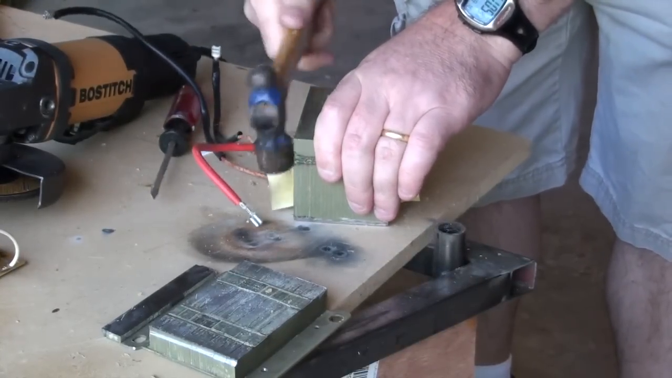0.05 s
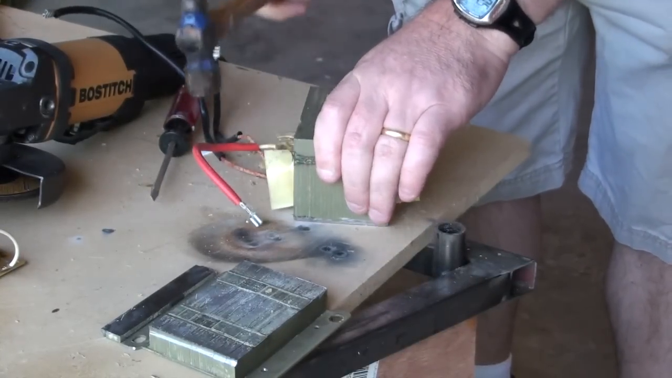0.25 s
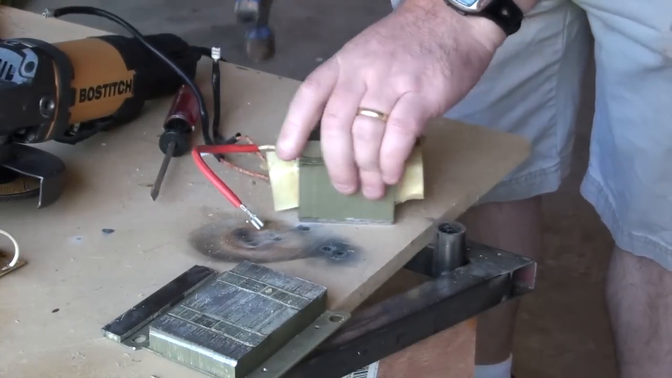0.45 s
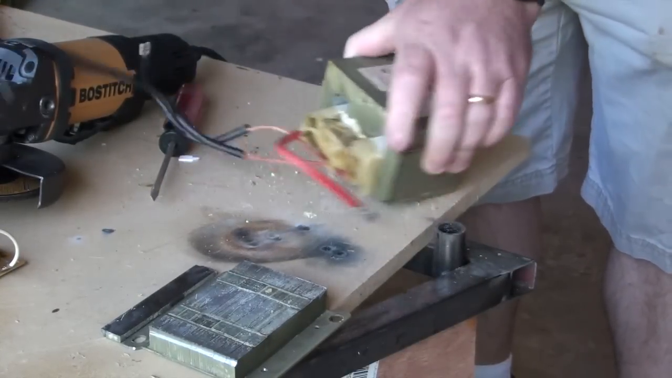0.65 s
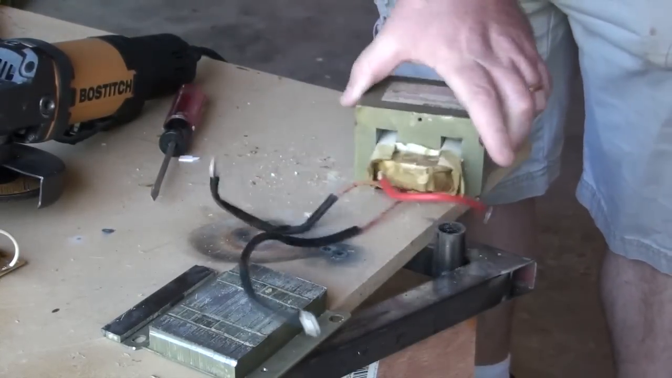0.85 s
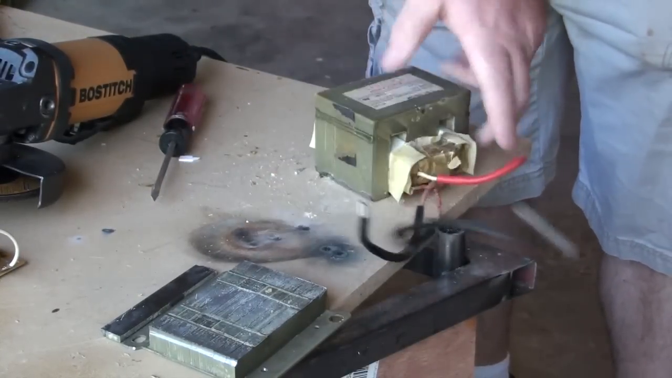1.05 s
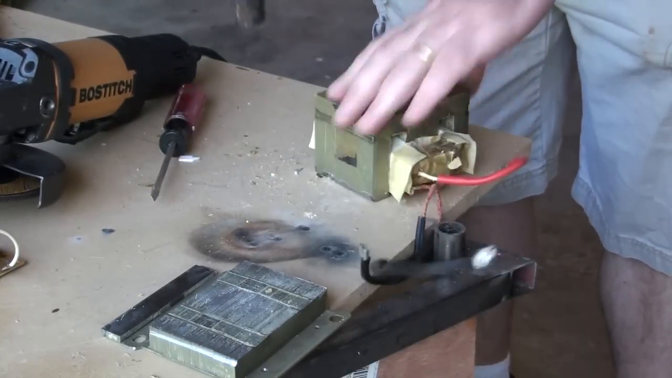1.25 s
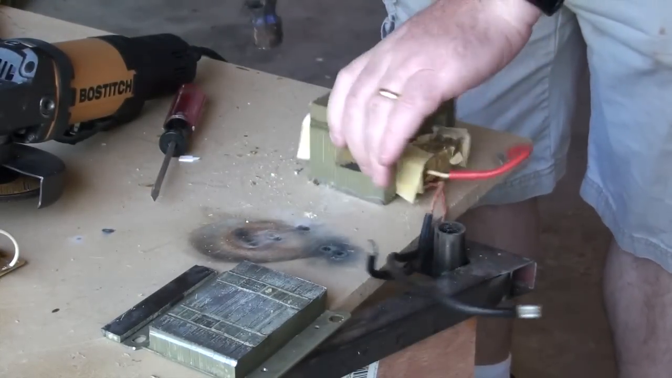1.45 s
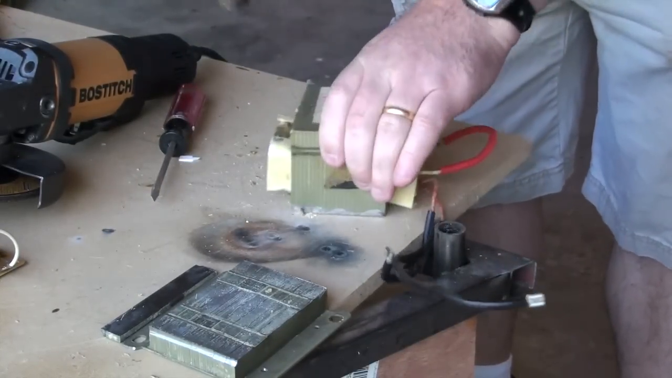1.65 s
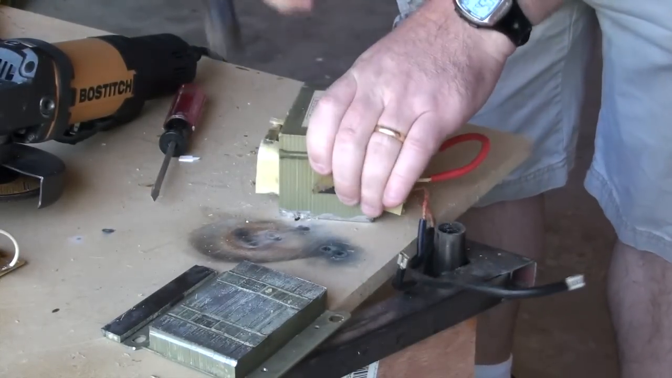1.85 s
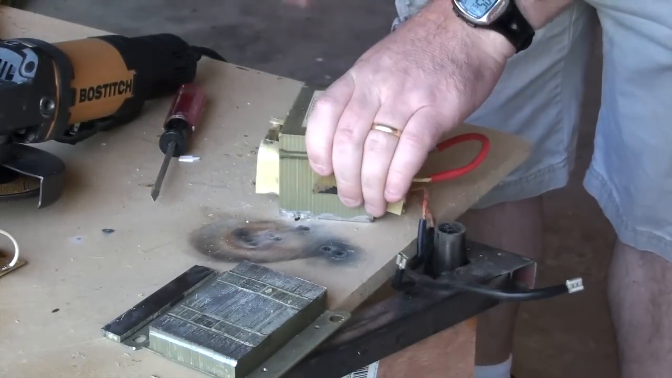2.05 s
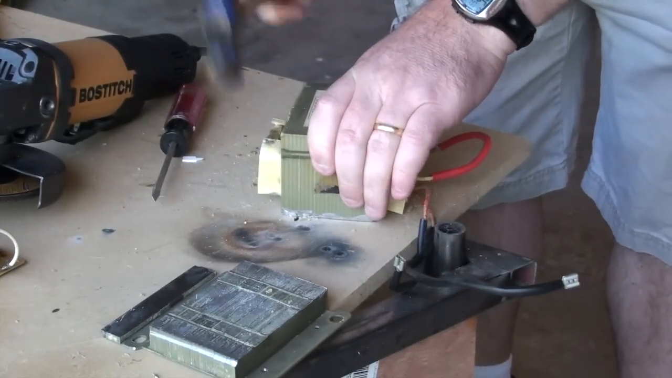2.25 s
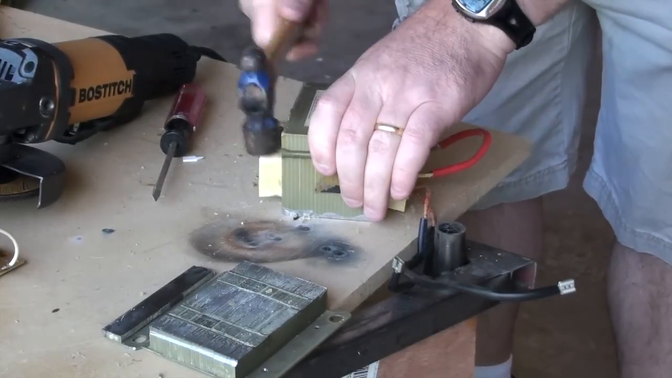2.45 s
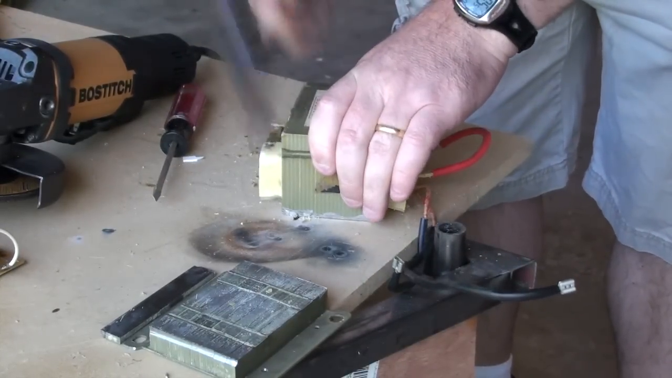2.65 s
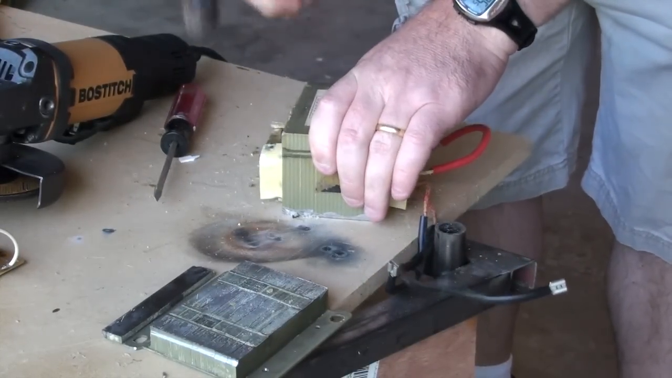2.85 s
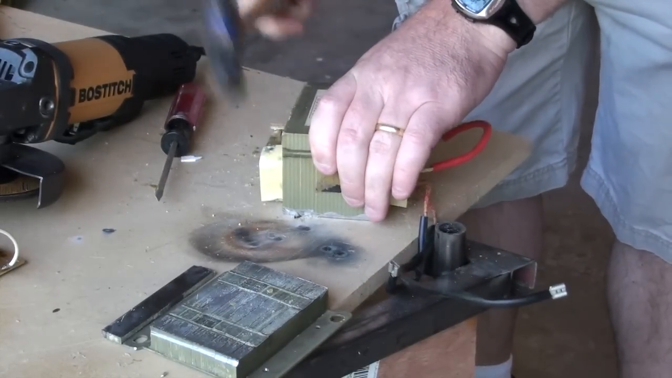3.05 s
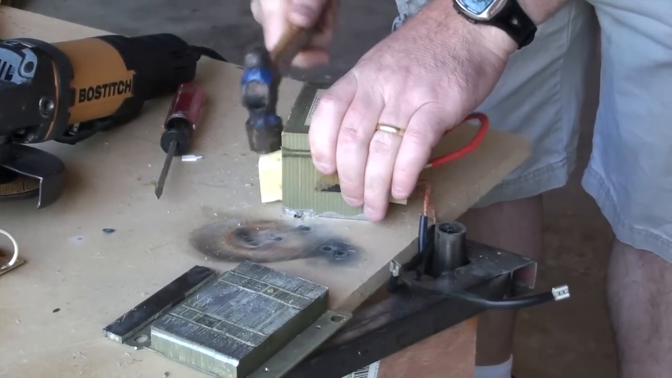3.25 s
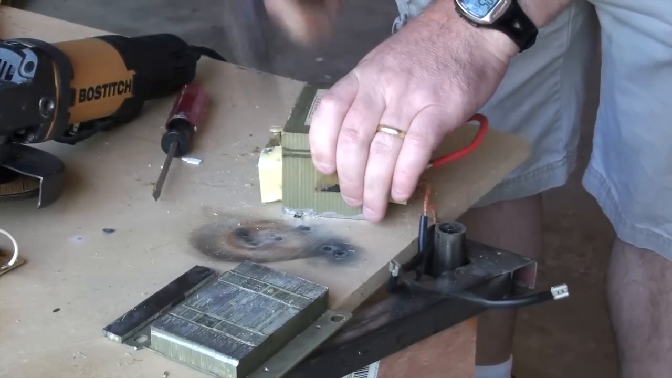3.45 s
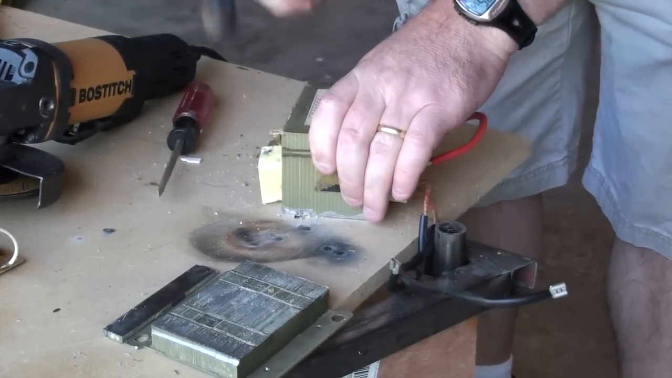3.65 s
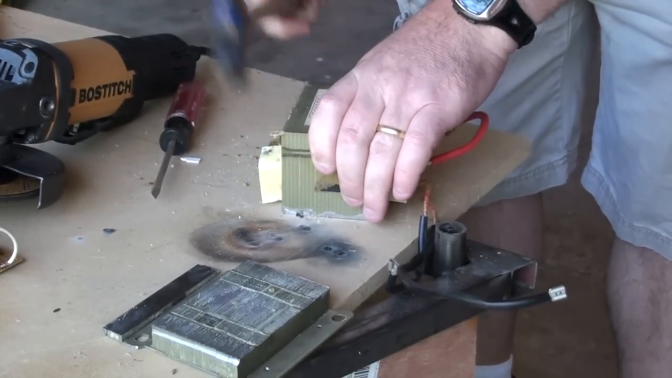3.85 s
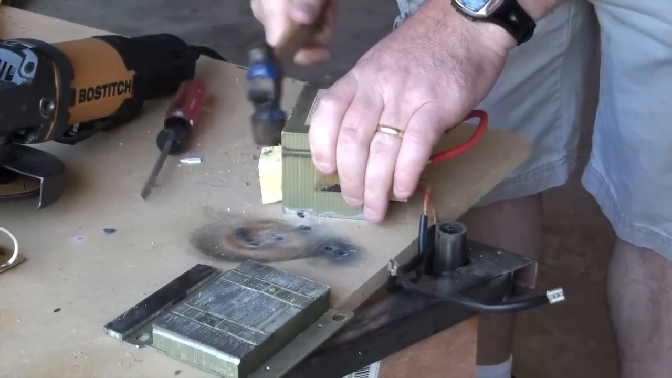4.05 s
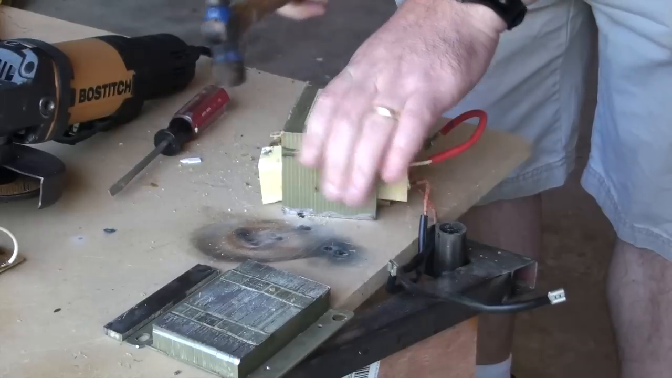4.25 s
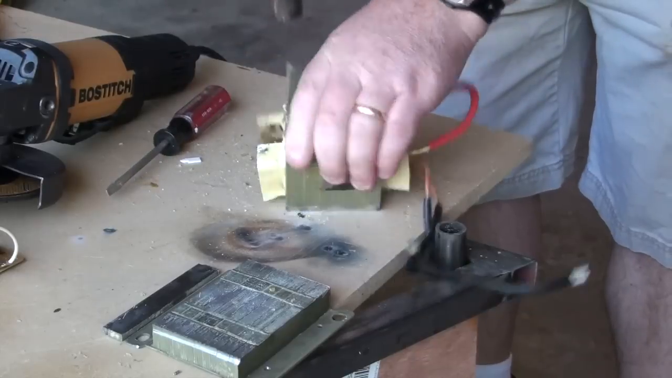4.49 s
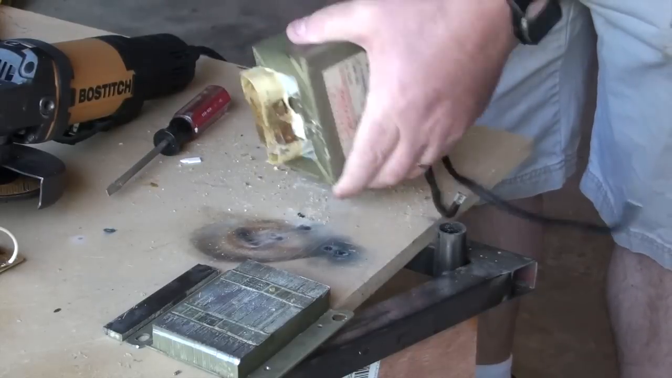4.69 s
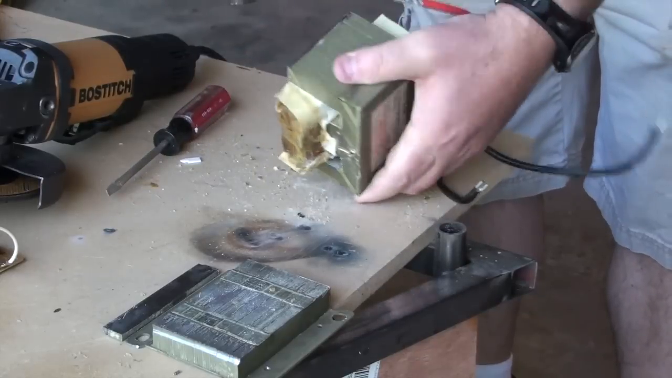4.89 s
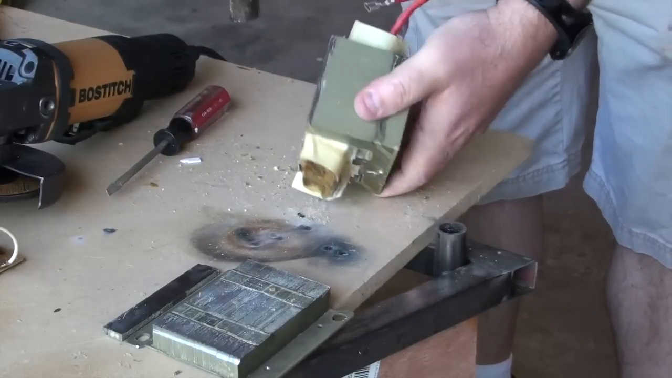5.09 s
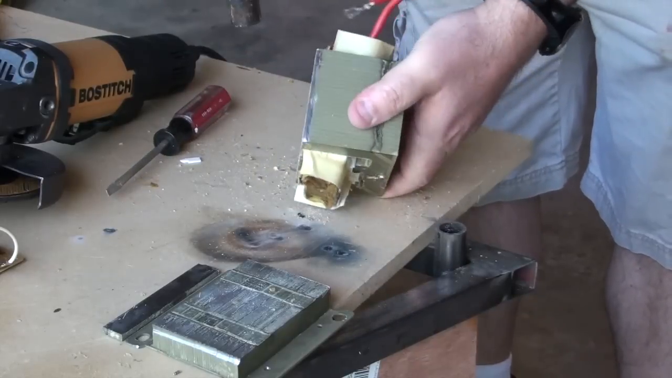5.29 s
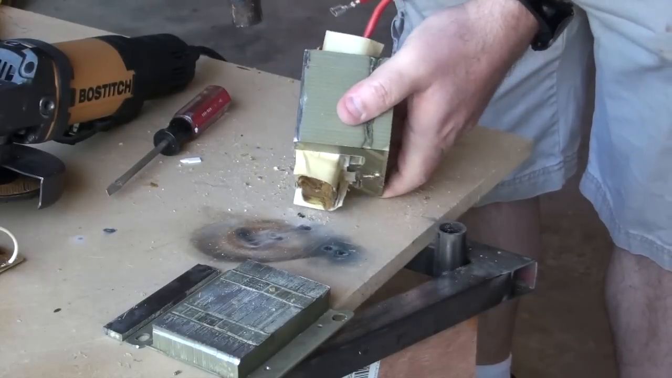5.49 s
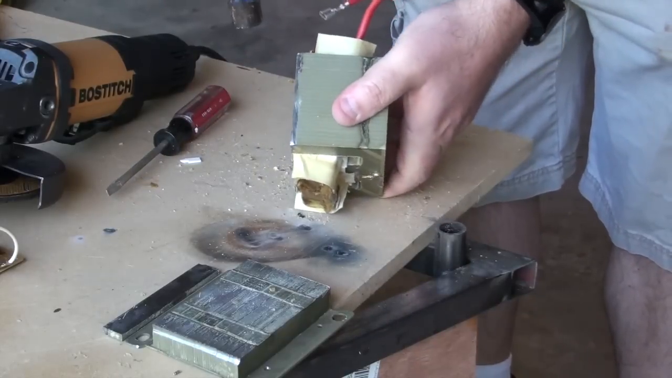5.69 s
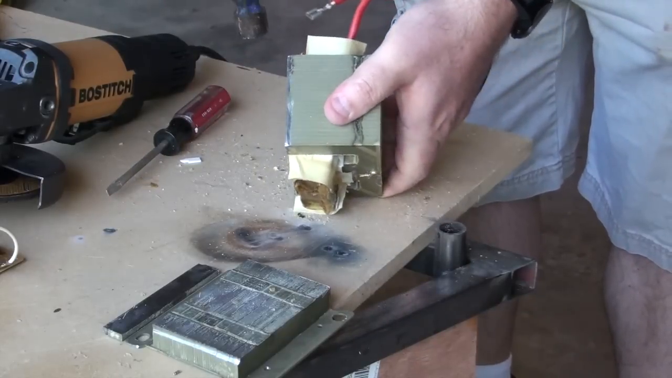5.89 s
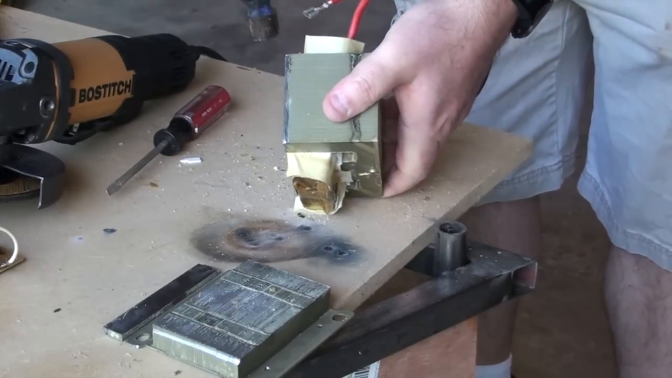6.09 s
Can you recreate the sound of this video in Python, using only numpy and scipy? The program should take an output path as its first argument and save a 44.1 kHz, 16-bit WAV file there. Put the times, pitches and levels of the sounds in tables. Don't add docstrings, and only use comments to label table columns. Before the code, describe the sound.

A hand hammer cracks a steel core on a booming wooden bench, the core is knocked and dragged round, then eight more steady blows follow.

```python
import sys
import numpy as np
from scipy import signal
from scipy.fft import rfft, irfft, next_fast_len
from scipy.io import wavfile
from scipy.ndimage import uniform_filter1d

SR = 44100
rng = np.random.default_rng(int(sys.argv[2]) if len(sys.argv) > 2 else 0)


def boost(x):
    u = np.asarray(x, float) / 20
    return 10 ** u


def store_wav(level_fs):
    pcm = np.round(np.clip(np.atleast_2d(level_fs), -1, 1) * 32767)
    wavfile.write(sys.argv[1], SR, pcm.T.astype(np.int16))


N = 270333


def noise(n):
    return rng.standard_normal(n)


def evened(x):
    return x / np.sqrt(np.mean(x ** 2) + 1e-20)


def read(points, hz):
    f, value = np.transpose(points)
    return np.interp(np.log(hz + 1), np.log(f + 1), value)


def add(mix, s, sound):
    part = mix[round(s * SR):][:len(sound)]
    part += sound[:len(part)]


def colour(x, points, tilt_db=0):
    size = next_fast_len(len(x))
    hz = np.fft.rfftfreq(size, 1 / SR)
    level_db = read(points, hz) + tilt_db * np.log2((hz + 100) / 1000)
    return irfft(rfft(x, size) * boost(level_db), size)[:len(x)]


def rings(modes, t, spread_db, detune=0.):
    total = 0
    for hz, db, t60 in modes:
        luck, drift = noise(2)
        envelope = boost(db + spread_db * luck - 60 * t / max(t60, .002))
        total = total + envelope * np.sin(2 * np.pi * hz * (1 + detune * drift) * t)
    return total


def resonate(x, hz, width):
    r = np.exp(-np.pi * width / SR)
    return evened(signal.lfilter([1, 0, -1], [1, -2 * r * np.cos(2 * np.pi * hz / SR), r * r], x))


def with_echo(x):
    lag = round(.0058 * SR)
    late = np.pad(x, (lag, 0))[:len(x)]
    dull = signal.lfilter(*signal.butter(1, 7000, fs=SR), late)
    return x + boost(-4.5) * dull


# pitch_hz, level_db_per_hz
CLATTER = [(24, -38), (40, -14.5), (102, -15.5), (172, 7), (427, 3), (564, 2.5), (1010, -6), (1620, -8.5),
           (2040, -12.5), (6660, -31.5), (11000, -42.5), (11900, -38), (15300, -56.5), (16500, -81)]
# pitch_hz, t60_s
DYING = [(60, 0.38), (160, 0.18), (500, 0.24), (1500, 0.22), (4000, 0.23), (8000, 0.21), (15000, 0.092)]
# pitch_hz, rise_s
BUILDING = [(60, 0.015), (300, 0.017), (800, 0.026), (2000, 0.0091), (15000, 0.034)]


def clatter(t, tilt_db, clank_db):
    walls_db, walls_longer = -16.5, 2.33
    clank_hz, clank_octaves = 1720, 0.66
    source = evened(colour(noise(len(t)), CLATTER, tilt_db))
    hz, s, z = signal.stft(source, SR, nperseg=512, noverlap=384)
    t60 = np.maximum(read(DYING, hz), .05)[:, None]
    rise = np.maximum(read(BUILDING, hz), .001)[:, None]
    shape = boost(-60 * s / t60) + boost(walls_db - 60 * s / (walls_longer * t60))
    shape *= 1 - .5 * np.exp(-(s / rise) ** 2)
    lumps = uniform_filter1d(noise(z.shape), size=4, axis=0)
    lumps = uniform_filter1d(lumps, size=16, axis=1)
    shape *= boost(1.8 * evened(lumps))
    clank_band = np.exp(-(np.log2((hz + 1) / clank_hz) / clank_octaves) ** 2)[:, None]
    shape *= boost(clank_db * clank_band * 3 * np.exp(-s / 0.03))
    tail = signal.istft(z * shape, SR, nperseg=512, noverlap=384)[1][:len(t)]
    shake = evened(uniform_filter1d(noise(len(t)), 300))
    return tail * boost(1.2 * shake) * (1 - np.exp(-t / .006))


# pitch_hz, level_db, t60_s
BOARD = [(87.3, -12.5, 0.26), (166.34, -0.5, 0.25), (262, -12, 0.15), (296, -7, 0.38), (336, -11.5, 0.43),
         (482.2, -3.5, 0.31), (567, -9.5, 0.22), (723, -9.5, 0.36), (827, -2.5, 0.18), (980, -14, 0.059),
         (1435, -19.5, 0.43), (1600, -14, 0.077), (1920, -21, 0.1), (2020, -15, 0.31)]
# pitch_hz, level_db, t60_s
LINGER = [
    (155, -24, 0.66),
    (169.7, -20.5, 0.58),
    (740, -27, 0.69),
    (552, -22, 0.46),
]


def board_boom(t, db):
    deep = rings(BOARD[:2], t, 1.0, 0.0047)
    upper = rings(BOARD[2:], t, 2.7, 0.0054)
    legs = rings(LINGER, t, 3.0)
    return boost(-4.5 + 0.05 * db) * (deep + upper + legs) * (1 - np.exp(-t / 0.011))


# pitch_hz, level_db, t60_s
HEAD = [(11630, -5, .18), (11658, -1, .22), (11690, -4, .18), (11730, -7, .15), (14150, -12, .17),
        (14200, -14, .15), (6780, 0, .13)]


def head_ring(t, db):
    return boost(db + 17.5) * rings(HEAD, t, 2.5, .0015) * (1 - np.exp(-(t / 0.061) ** 3))


def blow(db, tilt_db, ring_db, clank_db):
    t = np.arange(SR) / SR
    overdrive_db = 8
    bench = boost(db + overdrive_db) * clatter(t, tilt_db, clank_db)
    return bench + board_boom(t, db) + head_ring(t, ring_db)


# pitch_hz, level_db_per_hz
AIR = [(12, -32.5), (20, -7), (65, 1), (361, -22), (1470, -19.5), (1650, -21.5), (5670, -33), (6910, -30),
       (9670, -40.5), (13200, -32.5), (16500, -61)]


def air():
    swell = evened(uniform_filter1d(uniform_filter1d(noise(N), 3000), 3000))
    hum = boost(-64) * resonate(noise(N), 162, 27)
    return boost(-60.5 + 0.78 * swell) * evened(colour(noise(N), AIR)) + hum


# start_s, peak_db, pitch_hz, t60_s
KNOCKS = [(0.045, -19.5, 820, 0.025), (0.545, -41, 336, 0.03), (0.654, -38.5, 1122, 0.21),
          (0.83, -26, 583, 0.069), (0.942, -22, 390, 0.017), (0.963, -16.5, 239, 0.049),
          (0.966, -19, 758, 0.053), (0.9, -32.5, 160.5, 0.38), (1.554, -36, 1336, 0.28),
          (1.583, -22, 756, 0.049), (1.613, -26, 1430, 0.017), (4.565, -44.5, 385, 0.19),
          (4.609, -49, 395, 0.036), (4.612, -42, 160, 0.29), (4.722, -36, 1484, 0.037),
          (4.615, -40, 1450, .06), (5.05, -45, 2180, .04), (5.047, -46, 587, 0.097), (5.089, -44, 596, .1),
          (5.122, -53, 166, 0.16), (5.222, -55, 590, 0.11), (5.352, -52, 618, .1),
          (1.655, -35.5, 732, 0.48), (1.695, -33.5, 385, 0.24)]


def edge_knocks():
    out, t = np.zeros(N), np.arange(4410) / SR
    for s, db, hz, t60 in KNOCKS:
        modes = [(hz, db, t60), (1.3 * hz, db - 10, 0.46 * t60),
                 (2.1 * hz, db - 10.5, 0.69 * t60), (2.5 * hz, db - 9.5, 0.35 * t60)]
        add(out, s, rings(modes, t, 0.82) * (1 - np.exp(-t / 0.0015)))
    return out


def frame_note():
    t, energy = np.arange(N) / SR, 0
    for s, db, *_ in BLOWS:
        energy = energy + boost(2 * (db + 5) - 120 * (t - s) / 4.6) * (t > s)
    return boost(-55) * np.sqrt(energy) * np.sin(2 * np.pi * 1035 * t)


# pitch_hz, level_db
SIZZLE = [(1500, -17.5), (4000, 2.5), (9000, -3), (12000, -8), (16000, -22)]


def crack(db, hz, sizzle_db):
    t = np.arange(882) / SR
    pitch_hz = hz * (.28 + .9 * np.exp(-t / .0008))
    slide = np.sin(2 * np.pi * np.cumsum(pitch_hz) / SR) * np.exp(-t / .002)
    spit = evened(colour(noise(882), SIZZLE)) * np.exp(-t / .0016)
    contact = (slide + boost(sizzle_db) * spit) * (1 - np.exp(-t / .0004))
    return boost(db + 6.5) * with_echo(contact)


# start_s, strength_db, treble_tilt_db_per_octave, head_ring_db, core_clank_db
BLOWS = [
    (0.076, -7, 3, -53, 1.5),
    (2.2, -6.5, 2.5, -40, 0.2),
    (2.489, -6, 3.5, -36, 1),
    (2.765, -4.5, 3, -50.5, -1),
    (3.028, -5.5, 3, -54.5, -1),
    (3.303, -6.5, 2.5, -52, -1),
    (3.572, -3, 2.5, -28.5, -1.7),
    (3.83, -4, 2.5, -27, 1),
    (4.085, -4, 2.5, -33.5, 1.8),
]
# start_s, peak_db, pitch_hz, sizzle_db
CRACKS = [
    (0.0783, -4, 2590, -6),
    (2.1999, -8, 3860, -13),
    (2.4903, -8.5, 4760, -8.5),
    (2.767, -8.5, 4620, -6.5),
    (3.0282, -5.5, 6600, -17.5),
    (3.3038, -10.5, 3740, -11.5),
    (3.5727, -5, 2640, -10.5),
    (3.8302, -15, 4190, -5),
    (4.0855, -15, 2900, -1.5),
]


def hammer():
    out = frame_note()
    add(out, 0, blow(-5, 1.0, -58, 0.18)[round(0.19 * SR):])
    for s, *how in BLOWS:
        add(out, s, blow(*how))
    for s, *how in CRACKS:
        add(out, s, crack(*how))
    return out


# start_s, peak_db, pitch_hz, snap_db
TICKS = [(0.3844, -43, 4600, -2), (0.832, -16.5, 2820, -21), (0.944, -29.5, 2670, -16),
         (1.098, -33, 2630, 7), (1.488, -45, 2960, 1), (1.6103, -26, 2650, 0), (2.161, -60, 4410, 17),
         (2.983, -41.5, 4520, 4.5), (4.3494, -56.5, 3134, -13), (4.5505, -37.5, 4770, 5),
         (4.606, -36.5, 3230, 2), (4.7224, -40, 3080, -1), (5.001, -40.5, 4950, -8),
         (5.8202, -43.5, 5800, 5), (5.8236, -39, 5360, -0.5), (5.835, -27, 5130, 5),
         (5.887, -21.5, 3730, -5), (5.9808, -30, 3500, 4.5), (5.9906, -19, 3530, -6.5),
         (6.0202, -19.5, 3770, -11), (6.035, -20.5, 5070, 1), (6.093, -40, 2430, -15),
         (6.105, -33, 2470, -13)]
# pitch_hz, level_db
TICK = [(800, -21.5), (2500, -2.5), (3500, 5), (6000, 3), (9000, 1.5), (13000, -6), (16500, -19)]


def wire_ticks():
    snaps, pings, t = np.zeros(N), np.zeros(N), np.arange(4410) / SR
    for s, db, hz, snap_db in TICKS:
        add(snaps, s, boost(db + snap_db) * noise(len(t)) * np.exp(-t / 0.00029))
        add(pings, s, rings([(hz, db - 3.5, .007)], t, 1.1))
    return colour(snaps, TICK), pings


def small_hits():
    snaps, pings = wire_ticks()
    wide = edge_knocks() + snaps
    t = np.arange(SR // 2) / SR
    room = noise(len(t)) * boost(-60 * t / 0.2) * (t > .008)
    tail = signal.fftconvolve(wide, room / np.linalg.norm(room))[:N]
    return with_echo(wide + pings) + boost(-3.5) * tail


def pressure(moves, rise_db_per_s):
    t, power = np.arange(0, N + 32, 32) / SR, 0
    for s, held, db, grit_db, rumble_db in moves:
        rise_db = rise_db_per_s * np.maximum(s - t, 0)
        lift_db = 182 * np.maximum(t - s - held, 0)
        layers_db = np.array([[0], [grit_db], [rumble_db]])
        power = power + boost(np.maximum(db - rise_db - lift_db, -200) + layers_db) ** 2
    return np.repeat(power, 32, axis=1)[:, :N]


# full_pressure_s, held_s, pressure_db, grit_db, rumble_db
JOLTS = [(0.549, 0.021, -51, -4, 3), (0.658, 0.014, -46, -7, -0.5), (0.83, 0.0059, -40, 1, 6.5),
         (0.86, 0.07, -46.5, -0.5, 4), (0.944, 0.016, -37, -8, 2.5), (0.99, 0.13, -43, -5.5, 1),
         (1.31, 0.02, -66, -2, -12), (4.725, 0.019, -57, 0, -9), (5.0, 0.021, -73, 0, -10),
         (5.09, .01, -60, -10, 0), (5.22, 0.018, -66.5, 0, -15), (5.822, .02, -57, 8, 1.5),
         (5.887, 0.009, -66, 8, 6), (5.985, 0.0097, -58.5, 9, 4.5), (6.02, 0.019, -70, 4, 8),
         (6.092, 0.017, -55.5, -1, -12)]
# full_pressure_s, held_s, pressure_db, grit_db, rumble_db
SLIDES = [(0.6, 0.023, -47, -10, 2), (1.535, 0.055, -50.5, -17, 5), (1.585, 0.095, -37, -6.5, -6),
          (1.75, 0.064, -46.5, -4, 0.5), (1.95, 0.046, -66, -0.5, -19), (4.55, 0.045, -58, -9, 6.5),
          (4.615, 0.029, -53, 0.5, 1), (4.8, 0.096, -67.5, -12, 3), (5.045, 0.016, -56, -4, -1),
          (5.13, 0.048, -61.5, 1, -16), (5.3, 0.13, -74.5, 6.5, -13.5), (5.36, 0.039, -71, -1, -13.5)]
# pitch_hz, width_hz, level_db
RUB = [(534, 140, 14), (727, 62, 11.5), (1264, 70, 9), (1450, 100, 7.5), (1835, 83, 1.5), (1004, 740, -2.5)]
# pitch_hz, width_hz, level_db
RUMBLE = [(175, 28, 2), (279.6, 63, 0.5), (385, 53, 2.5)]
# pitch_hz, level_db_per_hz
GRIT = [(1200, -10), (2500, -3), (5000, -8.5), (8000, -17.5), (11000, -37), (13500, -44), (16000, -54)]


def drag():
    slides = pressure(SLIDES, 268)
    jolts = pressure(JOLTS, 2500)
    rub, grit, low = np.sqrt(slides + jolts)
    slips = boost(3.5 * np.minimum(rng.exponential(1, N), 3)) * (rng.random(N) < 1500 / SR)
    judder = boost(1.6 * evened(uniform_filter1d(noise(N), 400)))
    grains = noise(N) * (0.72 + slips) * judder
    board = evened(sum(boost(db) * resonate(grains, hz, width) for hz, width, db in RUB))
    rumble = evened(sum(boost(db) * resonate(grains, hz, width) for hz, width, db in RUMBLE))
    return rub * board + low * rumble + grit * evened(colour(grains, GRIT))


# pitch_hz, left_over_right_db
LEAN = [(60, 3.6), (180, 2.0), (550, 0.0), (1650, 0.0), (4970, 0.0), (15000, 1.0)]
# pitch_hz, level_db
WIDE = [(30, -18), (90, -24), (160, -25), (330, -17), (1100, -16), (2000, -18), (4200, -26), (6400, -27),
        (8000, -12), (9800, -8), (11500, -21), (16000, -22)]


def scene():
    mid = hammer() + small_hits() + air() + drag()
    scatter = noise(6000) * np.exp(-np.arange(6000) / 1300)
    unlike = colour(signal.fftconvolve(mid, scatter / np.linalg.norm(scatter))[:N], WIDE)
    left = colour(mid, [(f, d / 2) for f, d in LEAN])
    right = colour(mid, [(f, -d / 2) for f, d in LEAN])
    return np.array([left + unlike, right - unlike])


# pitch_hz, level_db
MIC = [(20, -1), (100, 0), (10000, 0), (13000, -4), (15000, 0), (15700, 2), (16000, -18), (16850, -50),
       (17500, -90)]


def microphone(dry):
    return np.array([colour(port, MIC) for port in dry])


def limiter(heard):
    power_db = 10 * np.log10(abs(uniform_filter1d((heard ** 2).mean(0), size=320)) + 1e-12)
    fall_db = np.arange(N) * 500. / SR
    peak_db = np.maximum.accumulate(power_db + fall_db) - fall_db
    over_db = np.maximum(peak_db + 11.0, 0)
    return heard / boost(1.046 * uniform_filter1d(over_db, size=120))


def band_limit(x):
    return signal.sosfilt(signal.butter(12, 16820, fs=SR, output="sos"), x)


def record(dry):
    held = limiter(microphone(dry))
    return band_limit(np.clip(held, -1, 1))


dry = scene()
out = record(dry)
store_wav(out)
```